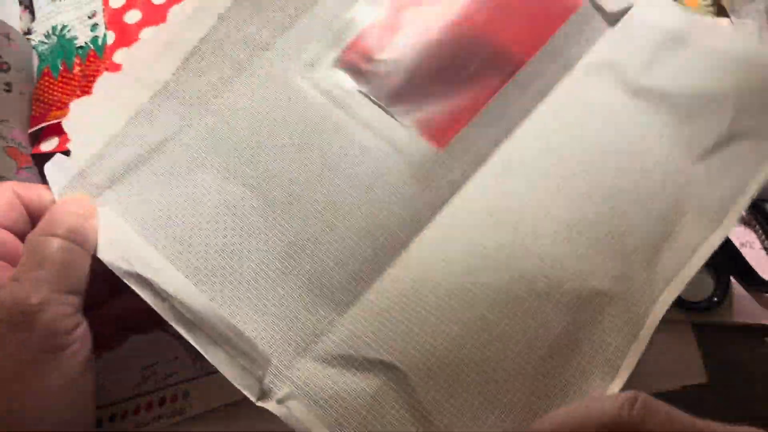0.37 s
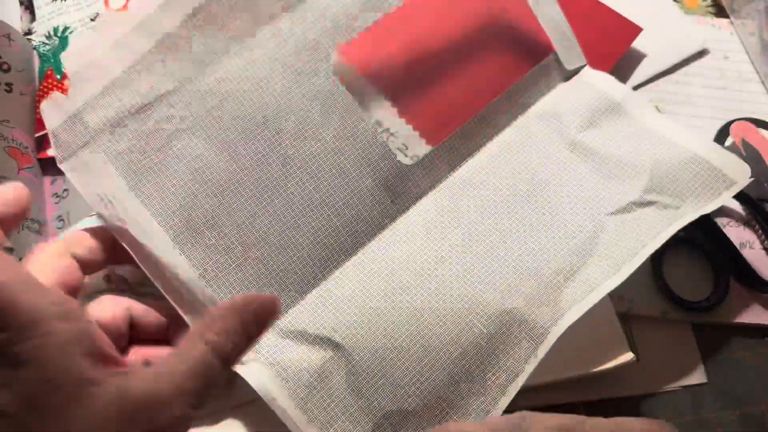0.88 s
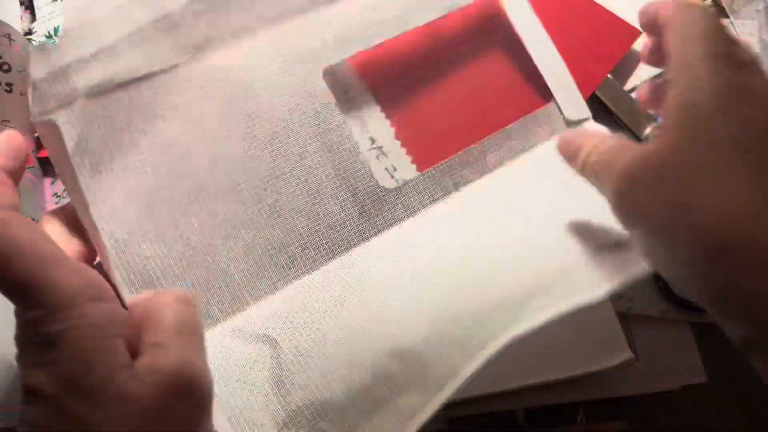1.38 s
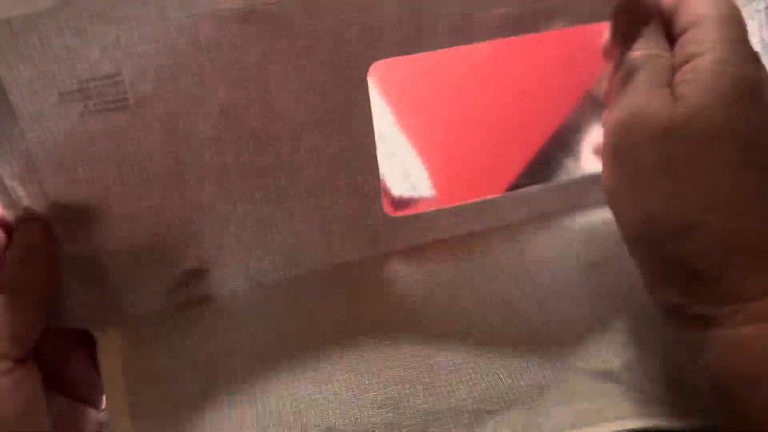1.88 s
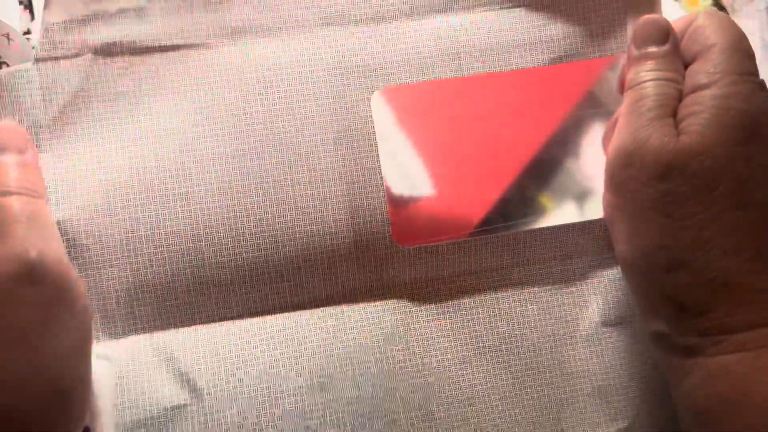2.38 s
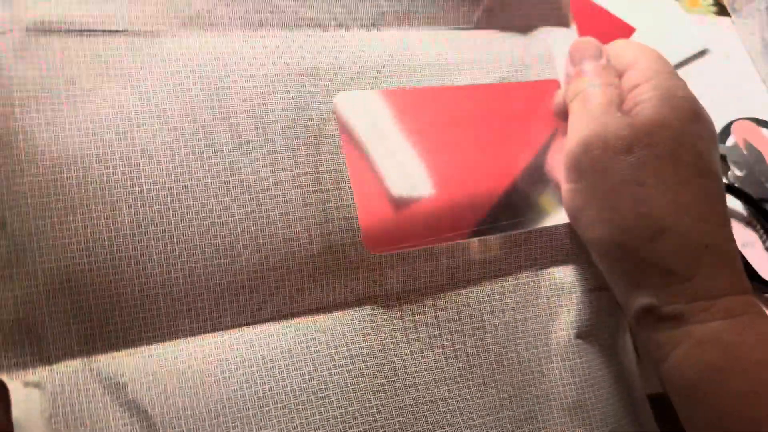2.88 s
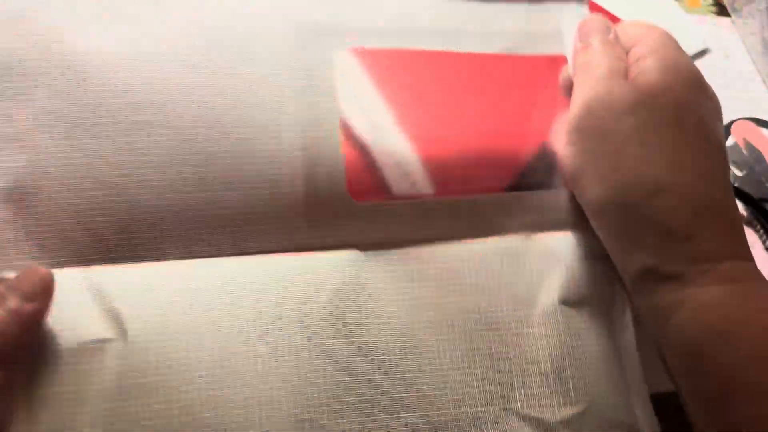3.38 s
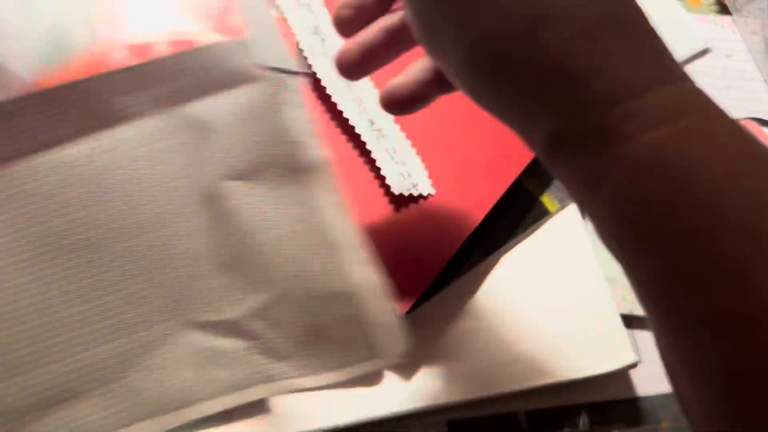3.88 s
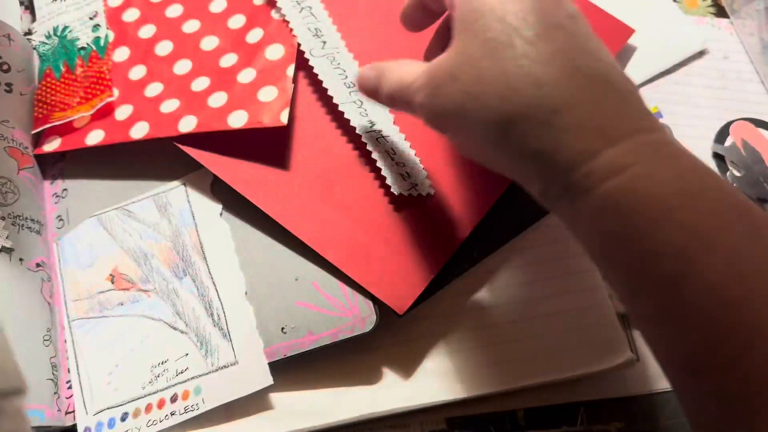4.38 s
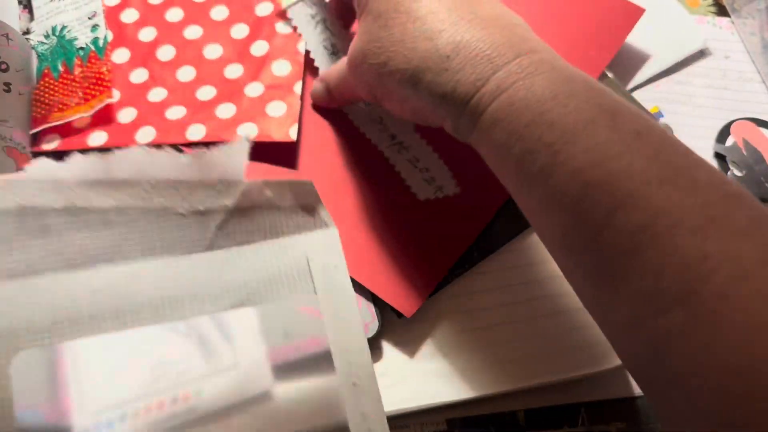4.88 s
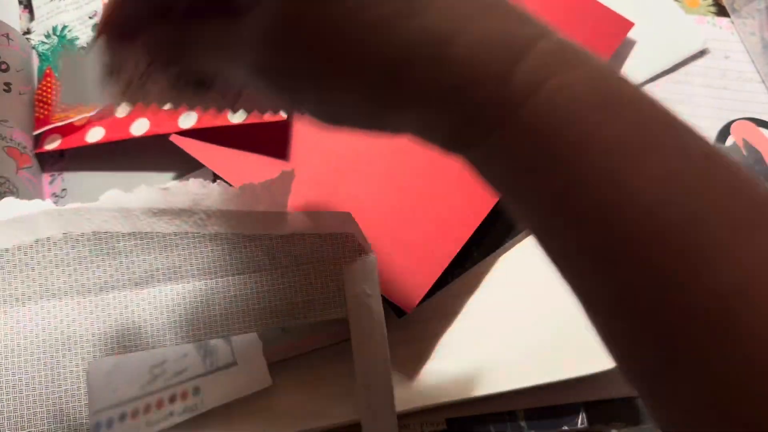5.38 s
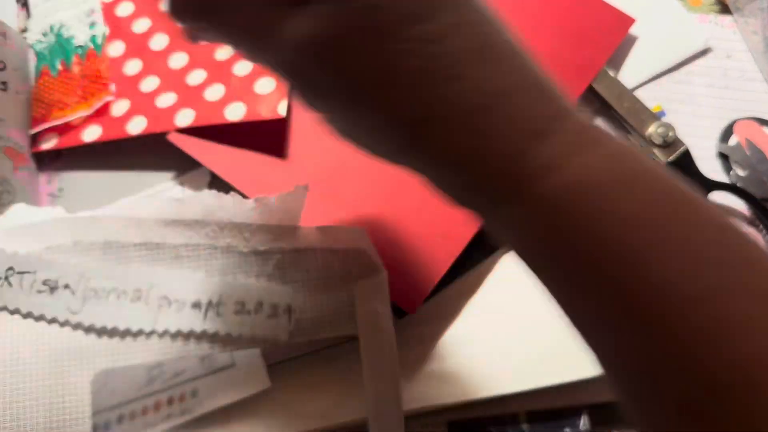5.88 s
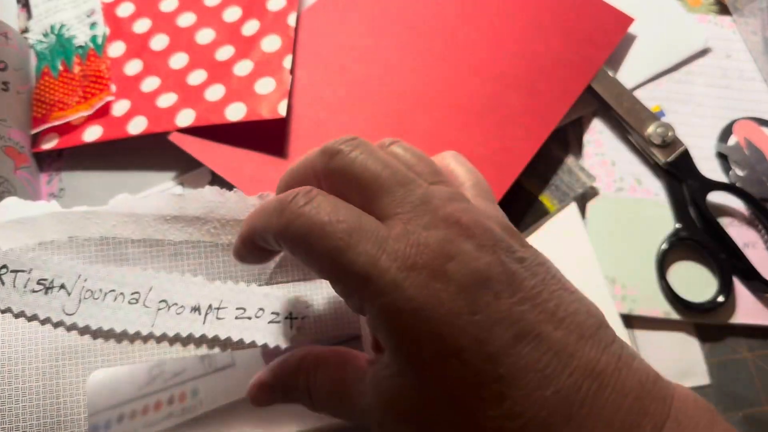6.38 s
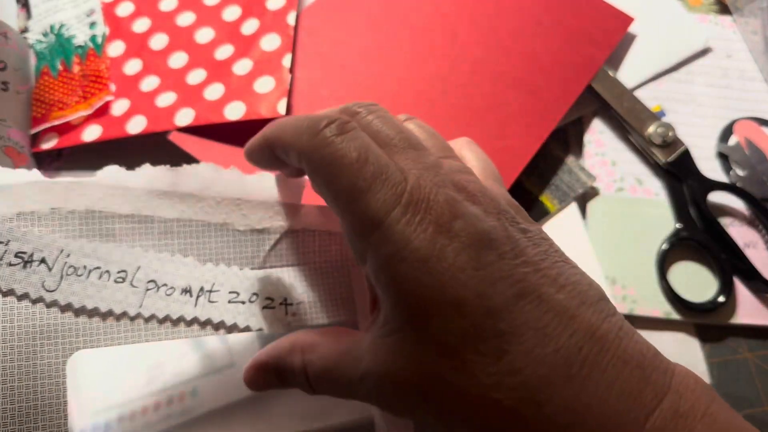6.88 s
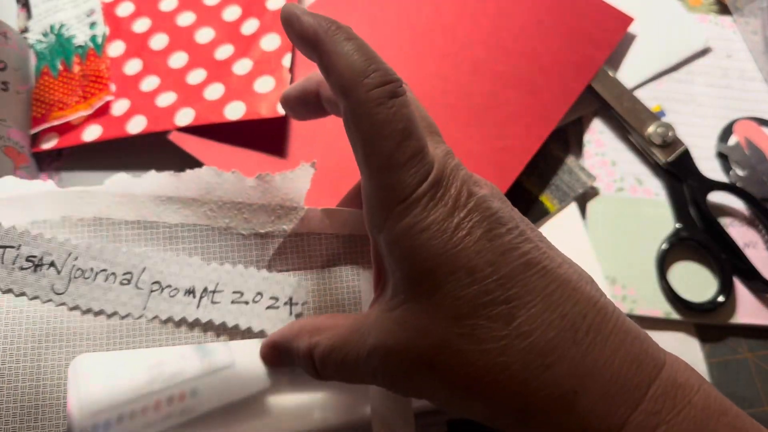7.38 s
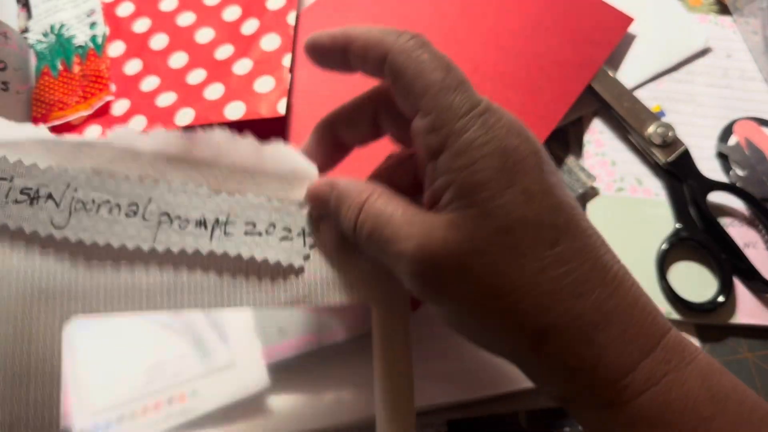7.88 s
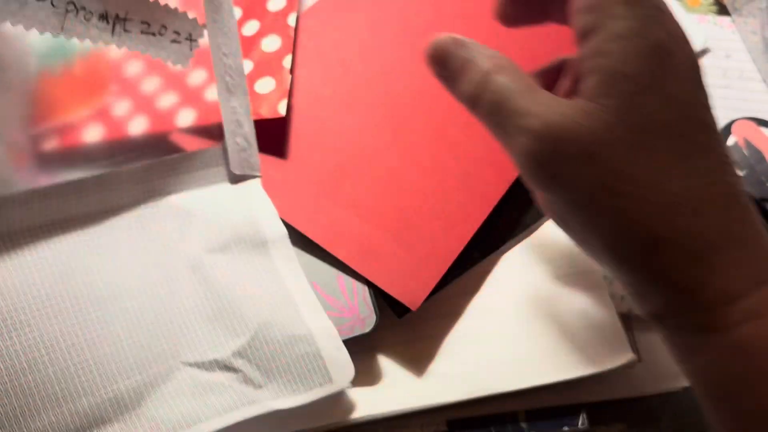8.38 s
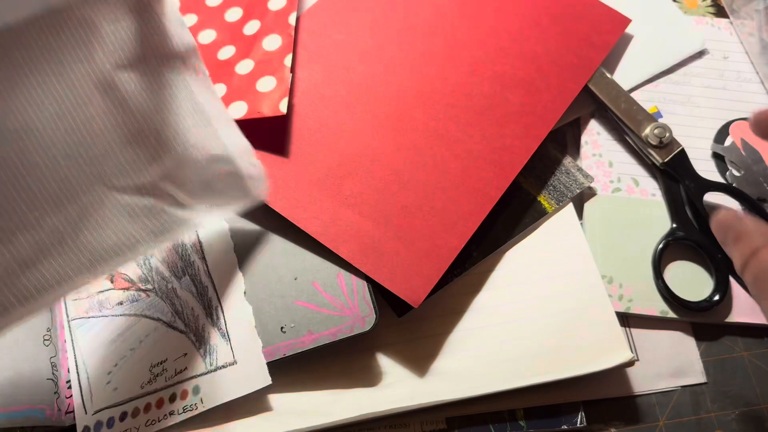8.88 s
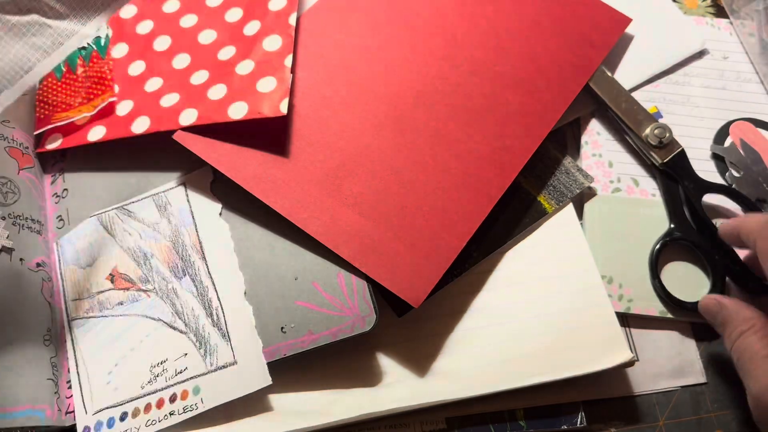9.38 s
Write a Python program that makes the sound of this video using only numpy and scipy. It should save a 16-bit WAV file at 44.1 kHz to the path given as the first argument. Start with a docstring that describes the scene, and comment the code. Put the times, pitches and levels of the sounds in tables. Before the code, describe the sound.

A stiff paper envelope crackles loudly up close, then rustles softer with sparse creases, a brief strip slide, and renewed crumpling near the end.

```python
"""An opened paper envelope rustles over a table as hands turn, bend and shift it, close by in a small quiet room.
Friction noise grained with fibre cracks makes the rustle; sudden bursts with ragged tails are creases snapping.
Damped sines and low noise are the sheet flapping, popping and pushing air; resonant noise is a sliding strip.
A short room answer and a faint room tone lie behind. Two microphone ports hear nearly the same sound, with
a phase difference that varies with frequency and is widest around 12 kHz."""
import sys
import numpy as np
from scipy import signal
from scipy.fft import rfft, irfft, next_fast_len
from scipy.io import wavfile
from scipy.ndimage import uniform_filter1d, map_coordinates

SR = 44100
rng = np.random.default_rng(int(sys.argv[2]) if len(sys.argv) > 2 else 0)


def wrap_up_sound(samples):
    """Save the sound to the file named by the first command line argument, as 16-bit audio."""
    columns = np.atleast_2d(samples).T
    # keep every value between -1 and 1, then stretch to whole-number steps
    tamed = np.clip(columns, -1, 1)
    steps = np.round(tamed * 32767).astype(np.int16)
    wavfile.write(sys.argv[1], SR, steps)


def gain_from_db(level_db):
    """Turn a decibel level (scalar or array-like) into a linear amplitude factor."""
    decades = np.asarray(level_db, float) / 20
    return 10 ** decades


N = 418950  # samples, 9.5 s


def unit(x):
    """Normalisation: scales a signal to an rms of 1."""
    return x / np.sqrt(np.mean(x ** 2, axis=-1, keepdims=True) + 1e-20)


def along(points, hz):
    """Logarithmic frequency axis: interpolates (frequency [Hz], value) points."""
    f, v = np.transpose(points)
    return np.interp(np.log(hz + 1), np.log(f + 1), v)


def curves(rows):
    """Linear interpolation in time: one value per sample for each column after the time."""
    s, *cols = np.transpose(rows)
    return np.array([np.interp(np.arange(N) / SR, s, c) for c in cols])


def wobble(rate):
    """Band-limited random modulation: a smooth curve through `rate` random knots a second."""
    knots = rng.standard_normal(int(N * rate / SR) + 4)
    return map_coordinates(knots, [np.arange(N) * rate / SR])


def filtered(x, response):
    """Linear filtering: multiplies the spectrum of x by a complex response of frequency."""
    m = next_fast_len(N + SR // 2)
    return irfft(rfft(x, m) * response(np.fft.rfftfreq(m, 1 / SR)), m)[..., :N]


def coloured(x, spectrum):
    """Minimum-phase filtering by the folded cepstrum; white noise keeps its level."""
    def response(hz):
        gain = gain_from_db(along(spectrum, hz))
        cepstrum = irfft(np.log(gain / np.sqrt(np.mean(gain ** 2))))
        cepstrum[1:len(hz) - 1] *= 2
        cepstrum[len(hz):] = 0
        return np.exp(rfft(cepstrum))
    return filtered(x, response)


def mix(sharp, step_db):
    """Spectral balance: body, hollow and bright are loudest at sharpness 0, -1 and 1, and fall off in dB as
    the square of the distance, by step_db one step away."""
    return -step_db * np.subtract.outer([0, -1, 1], sharp) ** 2


# Colours of the three parts of the paper sound: (frequency [Hz], relative level per Hz [dB])
BODY_COLOUR = [(700, -9), (1300, 3), (1670, -0.5), (2000, 3.5), (3000, -0.5), (4200, -4), (6000, -40)]
HOLLOW_COLOUR = [(110, -21.5), (230, -3), (400, -0.5), (600, -3), (850, 3.5), (1200, 3), (2200, -23.5)]
BRIGHT_COLOUR = [(3000, -24), (4900, -5), (5500, 0), (8000, -4), (11400, -6.5), (12800, -10), (15000, -8.5)]


def parts(body, hollow, bright):
    """Source-filter principle: white excitations ring through the three colours of the sheet."""
    return coloured(body, BODY_COLOUR) + coloured(hollow, HOLLOW_COLOUR) + coloured(bright, BRIGHT_COLOUR)


def rings(events, fall):
    """Damped oscillation: sines that start within a cycle, decay exponentially and sag in pitch."""
    out, t = np.zeros(N + SR), np.arange(SR // 2) / SR
    for s, db, hz, t60 in events:
        turns = hz * t / (1 + fall * t)
        onset = 1 - np.exp(-3.5 * hz * t)
        decay = gain_from_db(db - 60 * t / abs(t60))
        out[round(s * SR):][:len(t)] += decay * onset * np.sin(2 * np.pi * turns)
    return out[:N]


# Colour of the faint room tone: (frequency [Hz], relative level per Hz [dB])
TONE_COLOUR = [(15, -51), (35, -7.5), (127, -7), (202, -18.5), (272, -9), (742, -23), (16400, -48)]


def room_tone():
    """Stationary background noise: steady coloured noise at an rms of -74 dB."""
    return gain_from_db(-74.0) * coloured(rng.standard_normal(N), TONE_COLOUR)


# Reverberation time of the room: (frequency [Hz], t60 [s])
ROOM_T60 = [(500, 0.22), (10000, 0.02)]


def room(x):
    """Reverberant decay: each frequency of the room's answer dies at its own speed."""
    hz, t, z = signal.stft(rng.standard_normal(SR // 3), SR, nperseg=256)
    decay = gain_from_db(-60 * t / along(ROOM_T60, hz)[:, None])
    tail = signal.istft(z * decay, SR, nperseg=256)[1]
    delayed = np.pad(x, (300, 0))  # samples
    return signal.fftconvolve(delayed, tail / np.linalg.norm(tail))[:N]


# Unshared part of the two ports against the shared sound: (frequency [Hz], level [dB])
APART_LEVEL = [(60, -52), (250, -17.5), (700, -3.5), (1100, -25), (2500, -29.5), (5000, -16), (9000, -14.5),
               (11500, -45)]


def unshared(x):
    """Decorrelation by scattering: the same sound by another short path, weighted by frequency."""
    n, t60 = SR // 10, 0.047  # samples, s
    path = rng.standard_normal(n) * gain_from_db(-60 * np.arange(n) / SR / t60)
    scattered = signal.fftconvolve(x, path / np.linalg.norm(path))[:N]
    return filtered(scattered, lambda hz: gain_from_db(along(APART_LEVEL, hz)))


# Sliding strip, before a random level flutter: (time [s], level [dB])
SLIDE_LEVEL = [(4.42, -110), (4.45, -61), (4.6, -59), (4.63, -68), (4.67, -56), (4.75, -66), (4.95, -110)]
# Resonances of the strip in mid-slide: (frequency [Hz], width [Hz], relative level [dB])
STRIP_MODES = [(1950, 260, 0), (3600, 200, -5), (5400, 250, -7)]


def slide():
    """Friction-driven resonance: a paper strip dragged over the table, its narrow modes climbing as it moves."""
    def modes(f):
        total = 0
        for k, (centre, width, db) in enumerate(STRIP_MODES):
            damping = 1j * f * width
            total = total + (-1) ** k * gain_from_db(db) * damping / (centre * centre - f * f + damping)
        return total

    friction = rng.standard_normal((2, N))
    low, high = unit(filtered(friction, lambda f: np.array([modes(f * 1.04), modes(f / 1.04)])))
    # equal-power crossfade from the lower to the higher modes within 0.25 s
    moved = np.clip((np.arange(N) / SR - SLIDE_LEVEL[0][0]) / .25, 0, 1) * np.pi / 2
    level = gain_from_db(curves(SLIDE_LEVEL)[0] + 2.2 * wobble(66))
    return level * (np.cos(moved) * low + np.sin(moved) * high)


# A buckled panel pops, before a random flutter: (time [s], level [dB], starting pitch [Hz], t60 [s])
PANEL_POPS = [(2.555, -27.5, 401, 0.05), (9.216, -44, 830, 0.11)]


def pops():
    """Snap-through buckling: a panel of the sheet pops with a hollow, fluttering note that sags."""
    return rings(PANEL_POPS, fall=2.2) * gain_from_db(4.8 * wobble(320))


# The sheet flaps once: (time [s], level [dB], starting pitch [Hz], t60 [s])
SHEET_FLAPS = [(0.276, -34.5, 56.1, 0.31), (1.678, -37.5, 126.4, 0.13), (2.342, -34, 78, 0.11),
               (2.452, -46, 70.6, 0.9), (2.575, -38.5, 80.2, 0.11), (2.746, -40.5, 99, 0.17),
               (3.177, -33.5, 81.4, 0.088), (3.345, -41.5, 78.4, 0.15), (5.2, -39.5, 257, 0.096),
               (7.232, -37, 111.5, 0.14), (7.441, -31.5, 203, 0.069), (8.3, -43, 103, 0.2),
               (8.553, -46, 148, 0.12), (8.698, -46, 152, 0.11), (8.797, -41.5, 126.7, 0.14),
               (8.93, -39.5, 101.8, 0.16), (8.975, -39.5, 192, 0.098)]


def flaps():
    """Plate bending: each flap of the whole sheet rings as a low damped oscillation."""
    return rings(SHEET_FLAPS, fall=0.55)


# Colour of the slow bending: (frequency [Hz], relative level per Hz [dB])
BASS_COLOUR = [(15, -55.5), (28, -29.5), (55, 7), (100, 2.5), (200, 0.5), (350, -29)]
# How freely the sheet hangs, as its bending at a rustle of -44.5 dB: (time [s], level [dB])
SWAY_LEVEL = [(.2, -55), (.8, -72), (1.6, -88), (2.1, -56), (2.6, -54), (3.6, -63), (4.1, -59.5),
              (4.8, -66.5), (5.8, -57), (7.6, -64), (8.8, -52.5), (9.5, -56)]


def sway(level_db):
    """Volume displacement: bending pushes air in low lumps that swell with the rustle."""
    lumps = unit(gain_from_db(3.5 * wobble(12) + 3 * wobble(30)) * coloured(rng.standard_normal(N), BASS_COLOUR))
    slow_db = uniform_filter1d(level_db, size=SR // 4)
    follows, jerks = .47, 0.63  # dB gained per dB of slow rustle, and of its quick swells
    sway_db = curves(SWAY_LEVEL)[0] + follows * (slow_db + 44.5) + jerks * (level_db - slow_db)
    return gain_from_db(sway_db) * lumps


# Creases snapping over: (time [s], level before the sharpness balance [dB],
# sharpness [-1 dull to 1 crisp], t60 of the body part [s])
CREASE_SNAPS = [(.005, -21.5, -0.65, 0.054), (0.0695, -21.5, 0.64, 0.09), (.102, -29, 0.96, 0.027),
                (0.108, -20, 1.3, 0.018), (.116, -22, .9, .015), (0.1225, -26, 1.1, .02),
                (.167, -22, 0.67, 0.068), (0.186, -25, 1, .02), (0.1939, -16, 0.48, 0.041),
                (0.23, -24.5, 0.52, 0.13), (0.259, -28.5, -0.78, 0.09), (0.2905, -24.5, 0.43, 0.056),
                (.422, -49, 0.57, 0.13), (0.524, -30.5, -0.45, 0.063), (1.118, -33, -0.029, 0.075),
                (1.208, -39, 0.49, 0.343), (1.329, -37.5, 0.56, 0.14), (1.3542, -30, 0.84, 0.014),
                (1.4044, -21, -2.05, 0.016), (1.442, -35, 0.81, 0.02), (1.5268, -31.5, 0.45, 0.16),
                (1.642, -37, 0.4, 0.077), (1.668, -32, 0.36, 0.055), (1.757, -32, 0.38, 0.26),
                (1.8348, -33.5, 0.53, 0.25), (1.8565, -28.5, 0.48, 0.061), (1.915, -34.5, 0.39, 0.21),
                (2.0906, -29.5, 0.3, 0.072), (2.3335, -36, -1, 0.095), (2.3478, -19, 0.7, 0.043),
                (2.405, -38.5, .2, 0.035), (2.469, -29, .6, 0.056), (2.538, -29, 0.35, 0.019),
                (2.556, -27.5, -0.67, 0.07), (2.7474, -33, -1.2, 0.012), (2.7947, -36, -1.9, 0.017),
                (2.851, -44, 0.56, 0.067), (2.914, -39.5, -1, 0.109), (3.048, -45, 1.2, 0.071),
                (3.1451, -42.5, -1.24, 0.027), (3.176, -47, 0.38, 0.021), (3.365, -41.5, -0.099, 0.098),
                (3.4125, -31, 0.66, .037), (3.525, -40, 1.3, 0.066), (3.5945, -28, 0.34, 0.12),
                (3.652, -30.5, 1.23, 0.036), (3.853, -37.5, 0.72, 0.16), (4.1549, -49.5, 0.48, 0.12),
                (4.4278, -44.5, -0.22, 0.0285), (4.503, -51.5, -0.86, 0.075), (4.662, -51.5, -0.12, 0.059),
                (4.79, -55.5, -.8, 0.08), (4.911, -44, 0.54, 0.18), (5.0582, -40.5, 0.48, 0.24),
                (5.0879, -34.5, 0.55, 0.067), (5.18, -34, 0.51, 0.053), (5.199, -16.5, 0.83, 0.15),
                (5.293, -35.5, 0.33, 0.073), (5.528, -39, 0.81, 0.032), (5.652, -39.5, 0.29, 0.11),
                (5.7594, -49, 0.062, .04), (5.776, -39, 0.87, .04), (5.7882, -27, 0.59, 0.032),
                (6.265, -65.5, -0.48, 0.072), (6.413, -56.5, 0.19, 0.12), (6.4476, -50.5, -0.066, 0.089),
                (6.499, -35, 0.11, 0.046), (6.7556, -57, 0.37, 0.11), (6.799, -54, 0.012, .05),
                (6.8141, -47.5, 0.1, .07), (6.96, -47.5, 0.23, 0.065), (6.974, -48, 0.44, 0.14),
                (7.004, -47.5, -0.36, 0.086), (7.2115, -51.5, 0.47, 0.061), (7.284, -53, -1.5, 0.04),
                (7.296, -54, 0.023, .06), (7.341, -53, 0.082, 0.062), (7.366, -45.5, 0.33, 0.1),
                (7.3958, -45.5, -0.049, 0.057), (7.4437, -21.5, 0.77, 0.096), (7.6227, -46, 0.27, 0.12),
                (7.84, -33.5, 0.46, 0.1), (7.8805, -24.5, 0.74, 0.096), (7.919, -36, 0.49, 0.092),
                (8.03, -47, 0.87, .08), (8.0782, -39, 0.75, 0.038), (8.182, -46, -0.26, 0.091),
                (8.212, -46.5, 0.19, 0.045), (8.2818, -34, 0.89, 0.065), (8.3024, -30, 0.88, 0.062),
                (8.428, -47, 0.58, .08), (8.5737, -39.5, 0.38, 0.033), (8.629, -38, 0.48, 0.047),
                (8.6749, -28, 0.67, 0.2), (8.711, -33, 0.68, 0.06), (8.749, -35.5, 0.53, 0.072),
                (8.812, -41.5, 0.63, 0.104), (8.9037, -34, 0.58, 0.045), (8.921, -24.5, 1.18, 0.046),
                (8.929, -29, 0.88, 0.053), (8.974, -33.5, -0.6, 0.012), (9.125, -42, 0.59, 0.14),
                (9.162, -35, 0.89, 0.056), (9.217, -37.5, -1.4, 0.12), (9.4122, -36.5, 0.58, 0.027)]


def snaps():
    """Impulsive energy release: a crease swells up to a single crack, then a ragged tail as the sheet settles."""
    lead = SR // 20  # samples of swell ahead of the crack
    t = np.arange(-lead, SR // 3) / SR
    levels, cracks = np.zeros((3, N + SR)), np.zeros((3, N))
    for s, db, sharp, t60 in CREASE_SNAPS:
        parts_db = db + mix(sharp, step_db=10)
        swell = .0003 + .007 * abs(t60)  # s; long creases give way more slowly
        t60s = np.abs(t60) * np.array([[1], [1.1], [.9]])  # treble dies first
        before = np.exp(np.minimum(t, 0) / swell)
        after = gain_from_db(-60 * np.maximum(t, 0) / t60s)
        start = round(s * SR)
        levels[:, start:][:, :len(t)] += gain_from_db(parts_db)[:, None] * np.where(t < 0, before, after)
        cracks[:, start] = gain_from_db(np.add(parts_db, 17)) / (1 + swell / 0.0012)  # the more sudden, the sharper
    ragged = unit(gain_from_db(2.2 * wobble(350)))
    tails = levels[:, lead:][:, :N] * ragged * rng.standard_normal(N)
    return parts(*(cracks + tails))


RUSTLE_STEP_DB = 5.5  # loss of a part one step of sharpness away from its own
# Fingers resting and shifting on the sheet:
# (time [s], level before the part balance [dB], sharpness [-1 dull to 1 crisp])
FINGER_CONTACT = [(0, -68, -0.54), (.5, -53, -.6), (.6, -46, 0.16), (.85, -49, 0.36), (.93, -61, 0.32),
                  (.995, -60, -0.69), (1.005, -49, 0.36), (2.55, -49.5, 0.15), (2.74, -66, -0.2),
                  (3.335, -58.5, -1.9), (3.45, -58.5, 0.85), (3.87, -99, -.1), (3.99, -76.5, 0.52),
                  (4.417, -77.5, 0.32), (4.46, -62.5, 0.069), (5.0, -52.5, 0.7), (5.55, -70, -0.65),
                  (5.645, -66, 0.26), (5.72, -60, -0.48), (5.89, -54, 0.89), (5.96, -82, 0.5),
                  (6.7, -80, 0.58), (6.85, -64.5, 0.58), (7.33, -68, 0.29), (8.25, -55.5, 0.17),
                  (8.62, -57, -1), (9.5, -58.5, 0.75)]


def contact_power():
    """Sliding friction: power of the three parts under the resting and shifting fingers."""
    contact_db, sharp = curves(FINGER_CONTACT)
    return gain_from_db(2 * (contact_db + mix(sharp, RUSTLE_STEP_DB)))


# The hands crumple the sheet: (peak time [s], peak level before the part balance [dB],
# rise from 20 dB under the peak [s], fall to 20 dB under the peak [s], sharpness [-1 dull to 1 crisp])
HAND_CRUMPLES = [(.12, -28.5, 1, 0.15, 0.63), (.3, -26.5, 0.31, 0.083, 0.31),
                 (0.539, -40.5, 0.036, 0.19, -0.028), (1.525, -37, 0.077, 0.024, 0.42),
                 (1.687, -24.5, 0.021, 0.041, -0.037), (1.857, -37.5, 0.051, 0.37, -0.22),
                 (2.148, -35, 0.1, 0.057, -0.093), (2.465, -40, 0.24, 0.056, -.2),
                 (2.561, -45.5, 0.025, 0.18, 0.21), (2.878, -42, 0.04, 0.17, 0.14),
                 (3.085, -49.5, 0.05, 0.03, -0.53), (3.2, -46.5, 0.038, 0.16, -0.75),
                 (3.353, -43.5, 0.0097, 0.12, -0.33), (3.605, -43, 0.19, 0.2, -0.012),
                 (3.861, -52.5, 0.23, 0.054, -0.68), (5.082, -53, 0.091, 0.54, 0.34),
                 (5.215, -39, 0.026, 0.15, 0.22), (5.51, -51, 0.19, 0.088, 0.37),
                 (5.67, -50.5, 0.024, 0.091, -0.17), (5.816, -59, 0.072, 0.071, 0.13),
                 (6.829, -50, 0.039, 0.036, -0.69), (7.02, -58.5, 0.11, 0.095, -1.1),
                 (7.23, -50, 0.053, 0.065, -0.44), (7.41, -50.5, 0.088, 0.26, 0.15),
                 (7.46, -44, 0.032, 0.062, .05), (7.787, -39, 0.21, 0.12, 0.19),
                 (7.904, -36.5, 0.019, 0.088, -0.04), (8.059, -46.5, 0.1, 0.11, 0.28),
                 (8.303, -36, 0.032, 0.069, -0.066), (8.473, -44, 0.073, 0.1, 0.084),
                 (8.696, -40, 0.042, 0.22, -0.28), (8.931, -38, 0.029, 0.1, -0.17),
                 (9.144, -44.5, 0.03, 0.036, -0.49), (9.35, -45, 0.028, 0.022, -0.039),
                 (9.499, -41, 0.0093, .05, 0.25)]


def crumple_power():
    """Energy envelopes: each crumple adds power to the three parts, swelling to its peak and dying."""
    t = np.arange(N) / SR
    power = np.zeros((3, N))
    roundness = 1.65  # 1 = straight slopes in dB, more = rounder top and steeper feet
    for s, db, rise, fall, sharp in HAND_CRUMPLES:
        near = slice(max(0, round((s - 3 * abs(rise)) * SR)), round((s + 3 * abs(fall)) * SR))
        away = np.maximum((s - t[near]) / abs(rise), (t[near] - s) / abs(fall))
        envelope = gain_from_db(2 * (db - 20 * away ** roundness))
        power[:, near] += np.outer(gain_from_db(2 * mix(sharp, RUSTLE_STEP_DB)), envelope)
    return power


# Balance of body, hollow and bright part in the rustle: (level [dB]) for each
RUSTLE_BALANCE = [-5, -3, -1]


def handling():
    """Power summation: gains of the three parts from contact and crumples together."""
    return gain_from_db(RUSTLE_BALANCE)[:, None] * np.sqrt(contact_power() + crumple_power())


def ticks(per_s, spread_db, t60):
    """Shot noise: envelope of many small fibre cracks, each sudden and dying fast; rms 1."""
    struck = rng.random(N) < per_s / SR
    sizes = struck * gain_from_db(spread_db * rng.exponential(size=N).clip(0, 2.2))
    return unit(signal.lfilter([1], [1, -gain_from_db(-60 / (t60 * SR))], sizes))


def patchy(x, depth_db):
    """Time-frequency modulation: random gain patches, as other spots of the sheet sound at each moment."""
    z = signal.stft(x, nperseg=256)[2]
    field = uniform_filter1d(rng.standard_normal(z.shape), size=5, axis=0)
    field = uniform_filter1d(field, size=8, axis=1)
    gain = gain_from_db(depth_db * field / field.std())
    return signal.istft(z * gain / np.sqrt(np.mean(gain ** 2)), nperseg=256)[1][:N]


def rustle(levels, level_db):
    """Friction and crackling noise: a hiss with clumps of small cracks; harder handling crackles more."""
    crackly = np.clip((level_db + 66.5) / 28, .2, 1)
    wide = ticks(per_s=200, spread_db=3.6, t60=.011)  # cracks heard in all parts at once
    own = np.array([ticks(per_s=110, spread_db=4, t60=.016) for _ in range(3)])  # and in one part alone
    grain = np.sqrt((1 + (crackly * (0.73 * wide + .5 * own)) ** 2) / (1 + crackly ** 2))
    hiss = rng.standard_normal((3, N))
    return patchy(parts(*(levels * grain * hiss)), depth_db=2.6)


def scene():
    """Superposition: paper, its room and a room tone as shared sound, plus a small unshared part."""
    levels = handling()
    level_db = 10 * np.log10(np.sum(levels ** 2, axis=0))
    paper = rustle(levels, level_db) + snaps() + pops() + slide()
    shared = paper + flaps() + sway(level_db) + gain_from_db(-17.5) * room(paper) + room_tone()
    apart = unshared(shared)
    return np.array([shared + apart, shared - apart])


# Band limit at the top: (frequency [Hz], gain [dB])
TOP_GAIN = [(15700, 0), (16000, -22), (16500, -40)]
# Phase difference of the ports: (frequency [Hz], out-of-phase part over in-phase part [dB])
PORT_LEAD = [(60, -32), (250, -19), (690, -12), (1200, -19), (1500, -38), (3900, -33), (4300, -9),
             (4820, -1), (5300, -8), (5700, -35), (6700, -32), (7200, -6), (9000, 0), (10900, 9),
             (11500, 34), (13600, 34), (14000, 5), (16000, 1)]


def ports(dry):
    """Interchannel phase: half of the difference falls to each port, and the top is cut."""
    def response(hz):
        half_phase = np.arctan(gain_from_db(along(PORT_LEAD, hz)))
        return gain_from_db(along(TOP_GAIN, hz)) * np.exp(1j * half_phase * [[1], [-1]])
    return filtered(dry, response)


def top_cut(x):
    """Nothing passes above the cut-off."""
    return signal.sosfilt(signal.butter(12, 16500, fs=SR, output="sos"), x)


def record(dry):
    """Two-port reception: the sound reaches both ports with their phase difference and band limit."""
    mixed = ports(dry)
    return top_cut(mixed)


dry = scene()
out = record(dry)
wrap_up_sound(out)
```